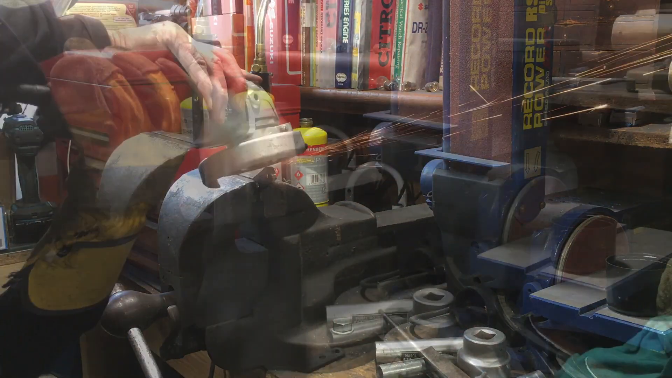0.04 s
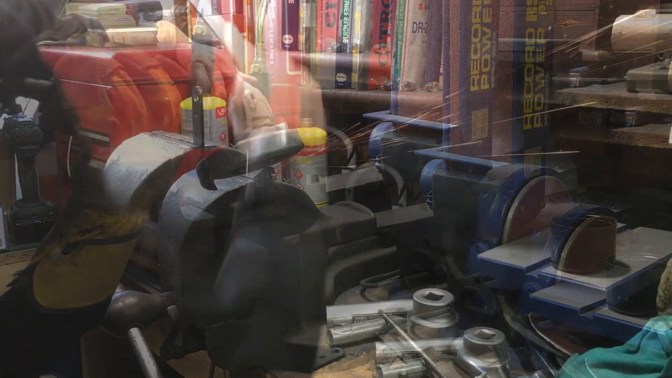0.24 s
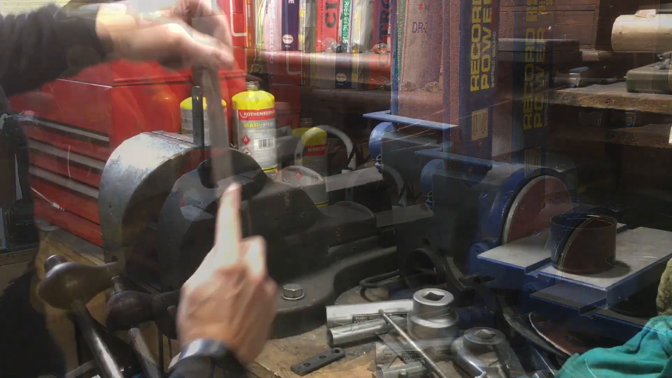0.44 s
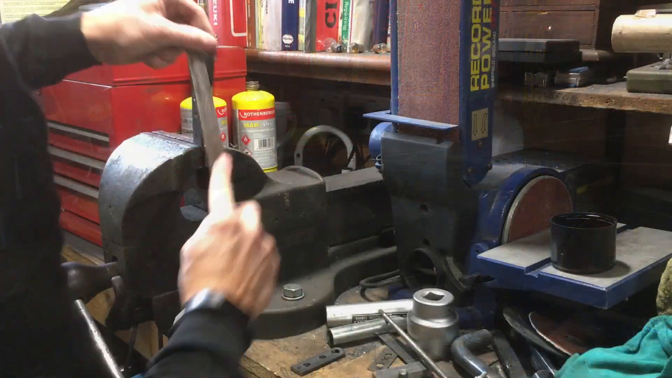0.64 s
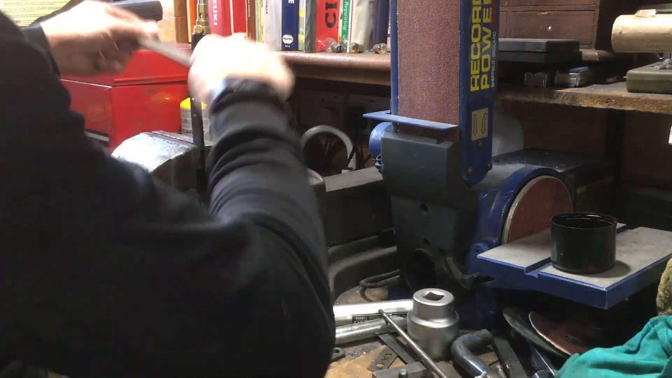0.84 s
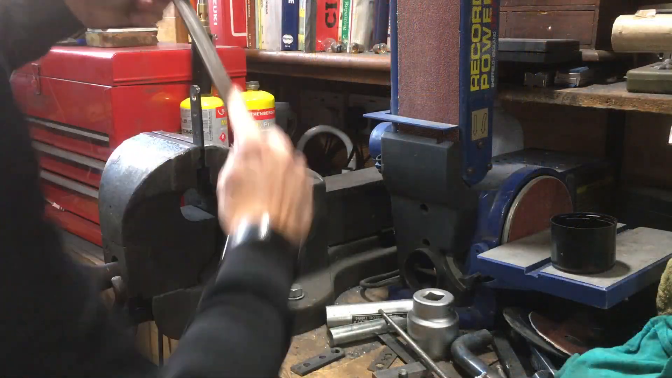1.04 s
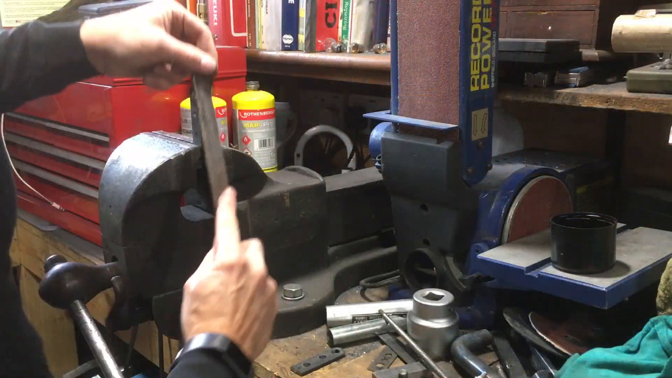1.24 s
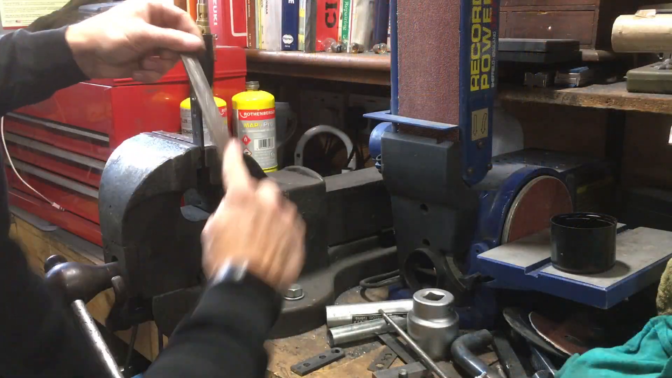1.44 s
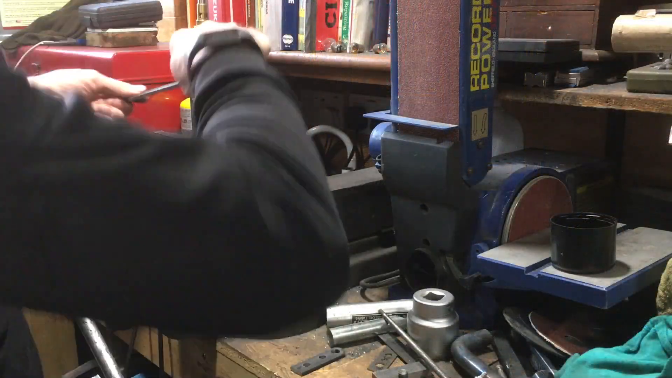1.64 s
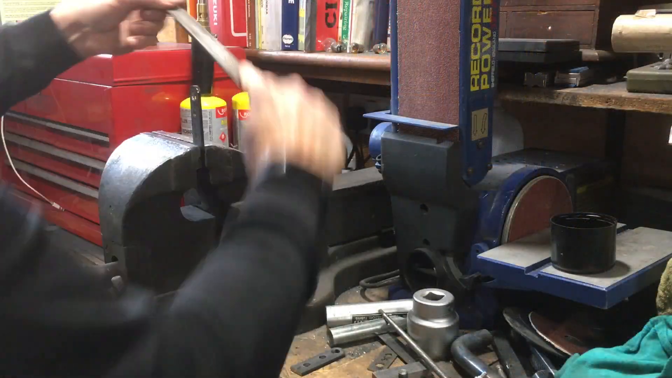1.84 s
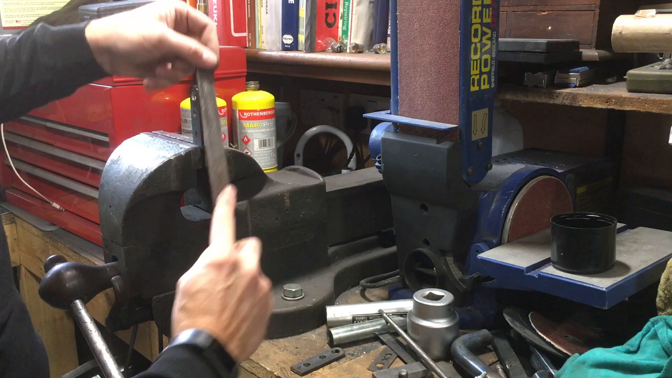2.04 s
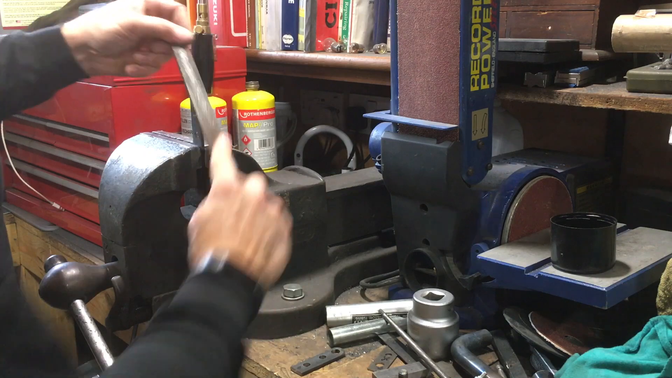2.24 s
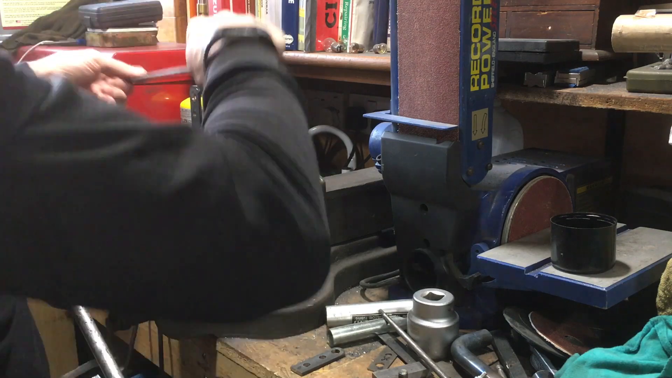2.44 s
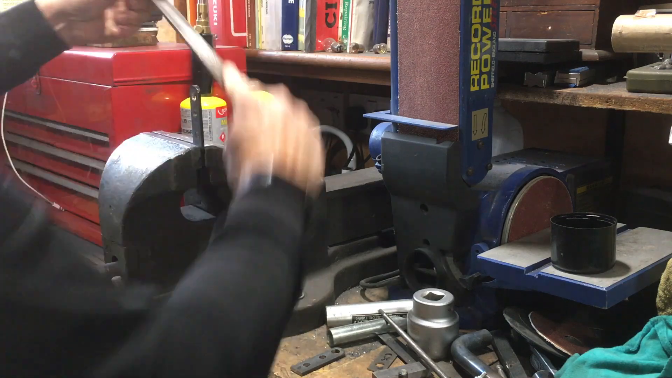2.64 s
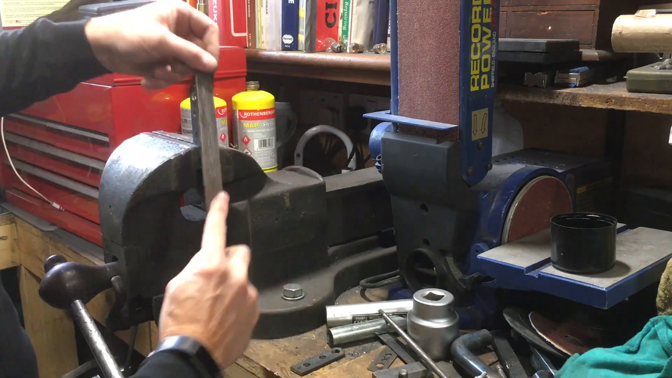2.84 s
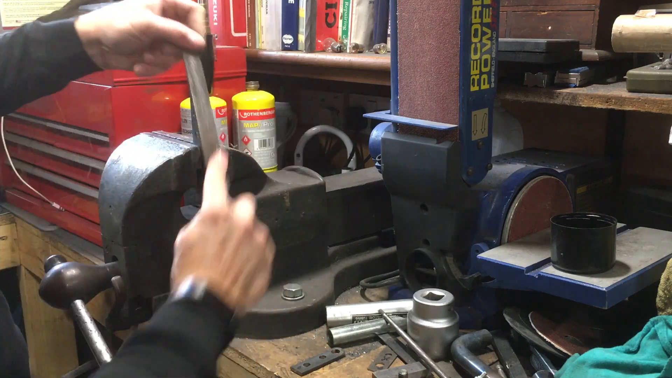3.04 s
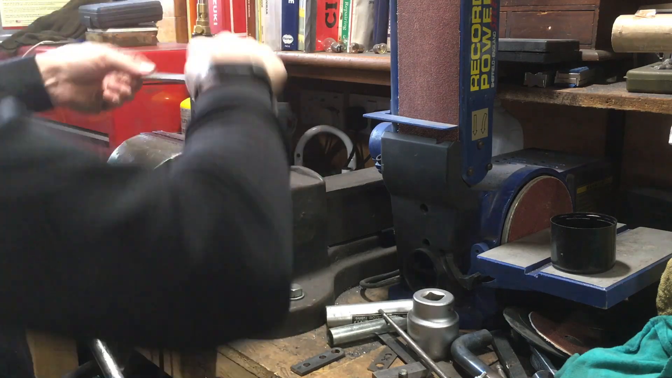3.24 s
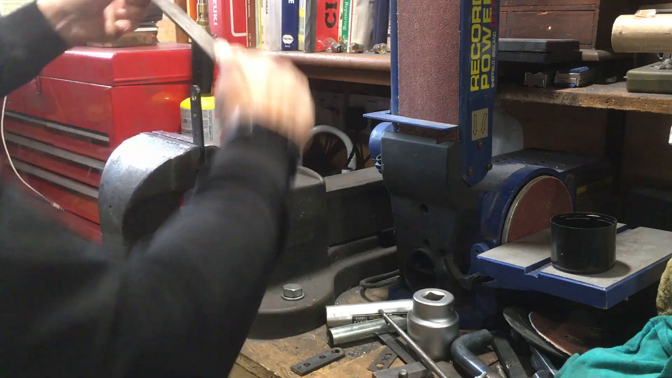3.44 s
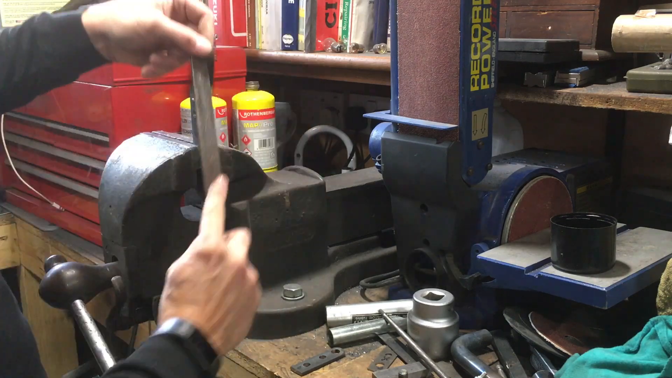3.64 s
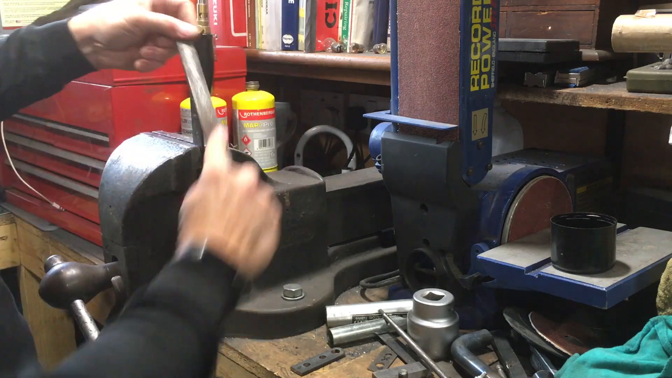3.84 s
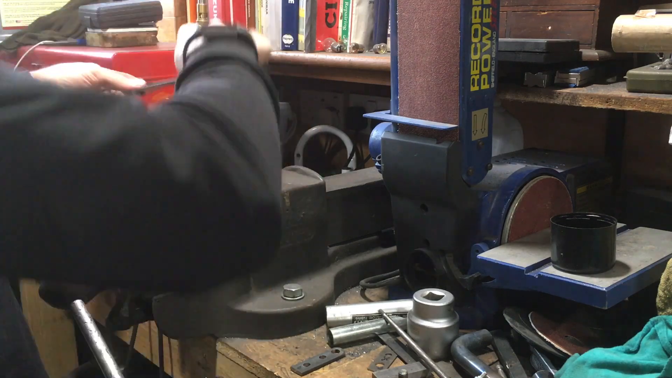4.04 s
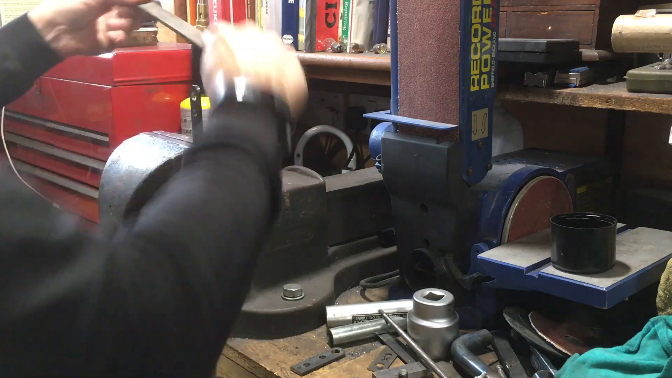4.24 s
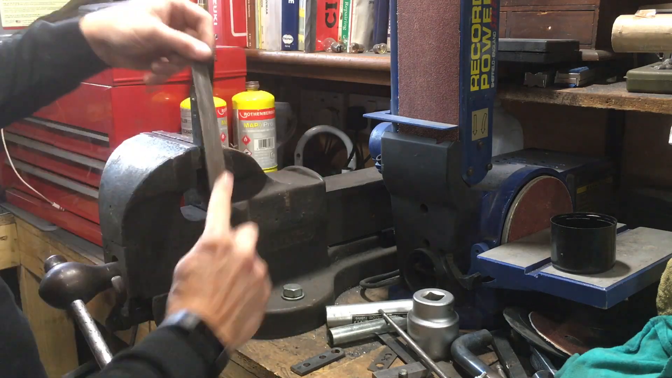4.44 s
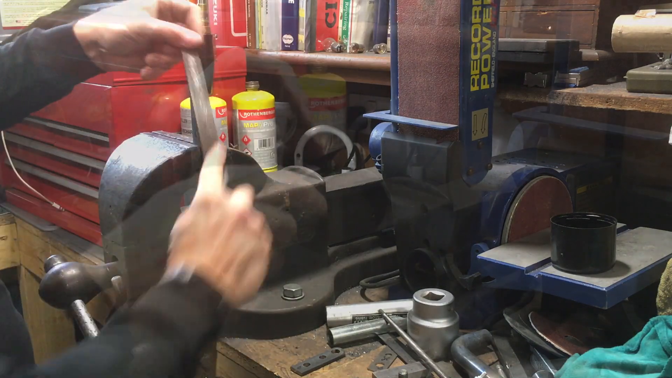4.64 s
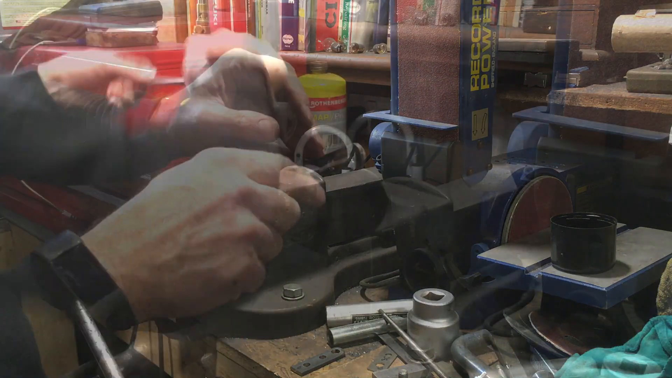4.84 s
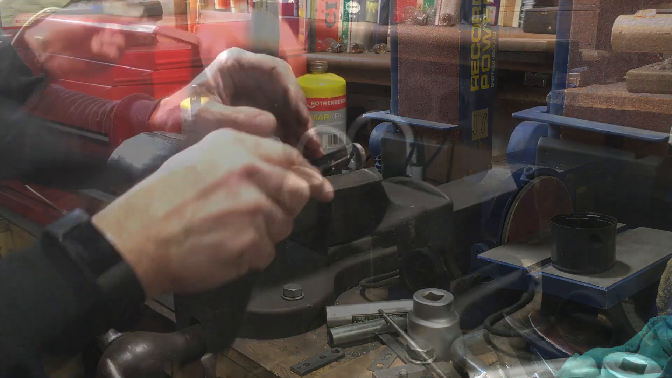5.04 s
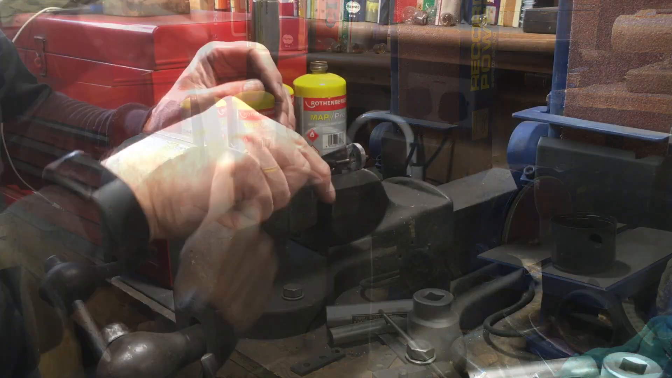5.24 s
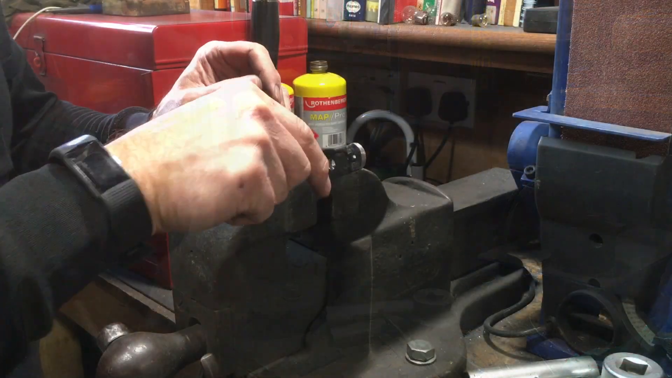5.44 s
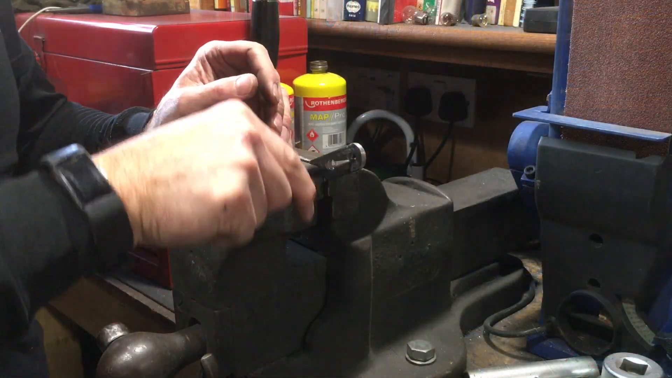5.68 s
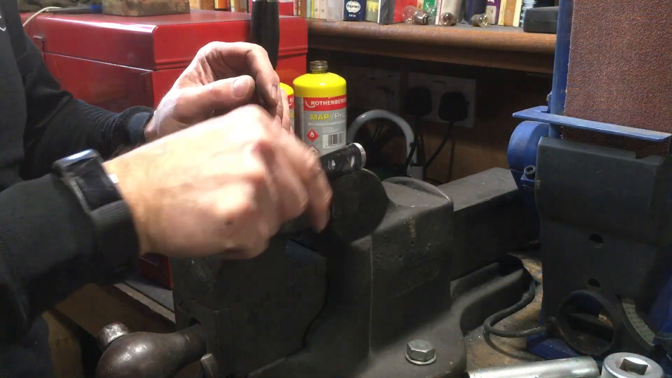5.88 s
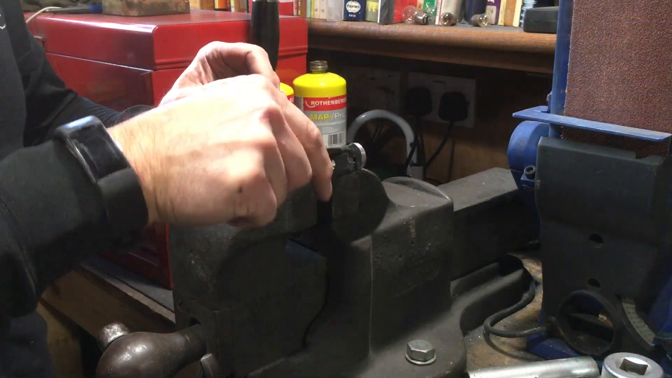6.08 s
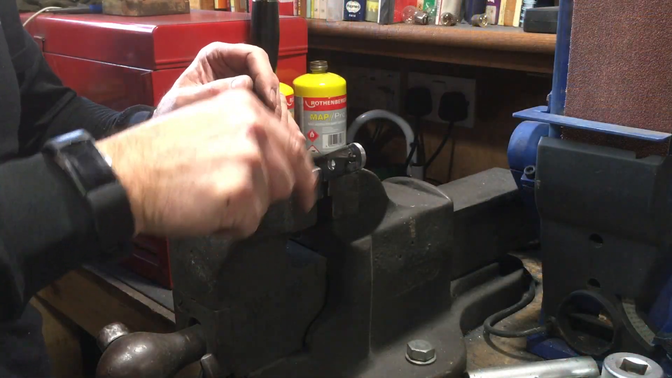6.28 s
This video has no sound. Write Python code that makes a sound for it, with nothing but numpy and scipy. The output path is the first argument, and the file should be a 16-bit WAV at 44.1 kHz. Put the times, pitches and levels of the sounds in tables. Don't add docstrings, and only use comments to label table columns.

```python
import sys
import numpy as np
from scipy import signal
from scipy.io import wavfile
from scipy.ndimage import uniform_filter1d

SR = 44100
rng = np.random.default_rng(int(sys.argv[2]) if len(sys.argv) > 2 else 0)


def transcribe(signal):
    frames = np.atleast_2d(signal).T
    limited = np.clip(frames, -1, 1)
    pcm = np.round(limited * 32767).astype(np.int16)
    wavfile.write(sys.argv[1], SR, pcm)


def level_to_linear(level):
    exponent = np.asarray(level, float) / 20
    return 10 ** exponent


N = 278271


def evened(x):
    return x / np.sqrt(np.mean(x ** 2) + 1e-20)


def smooth_twice(x, size, axis=-1):
    return uniform_filter1d(uniform_filter1d(x, size=size, axis=axis), size=size, axis=axis)


def read(points, hz):
    f, value = np.transpose(points)
    return np.interp(np.log(hz + 1), np.log(f + 1), value)


def add(mix, s, sound):
    part = mix[round(s * SR):][:len(sound)]
    part += sound[:len(part)]


def colour(x, spectrum, lo_hz=0, hi_hz=SR):
    hz = np.fft.rfftfreq(4096, 1 / SR)
    edges = 1 / (1 + (lo_hz / (hz + 1)) ** 8) / (1 + (hz / hi_hz) ** 8)
    log_gain = np.log(level_to_linear(read(spectrum, hz)) * edges + 1e-5)
    circle = signal.hilbert(np.r_[log_gain, log_gain[-2:0:-1]])
    impulse = np.fft.ifft(np.exp(np.conj(circle))).real
    return signal.oaconvolve(x, impulse)[:len(x)]


def ring(x, modes):
    out = 0
    for k, (hz, width, db) in enumerate(modes):
        pole = np.exp((2j * hz - width) * np.pi / SR)
        mode = signal.lfilter([1 - abs(pole)], [1, -pole], x).real
        out = out + (-1) ** k * level_to_linear(db) * 2 * mode
    return out


def glide(x, hz, width):
    turn = np.exp(2j * np.pi * np.cumsum(hz + np.zeros(len(x))) / SR)
    r = np.exp(-np.pi * width / SR)
    return 2 * (turn * signal.lfilter([1 - r], [1, -r], x / turn)).real


def grit(size, per_s, spread_db, clump_db):
    chance, strength, sign, slow = rng.random((size, 4)).T
    hits = (chance < per_s / SR) * level_to_linear(-spread_db * np.log(strength + 0.016)) * (sign - 0.5)
    clumps = evened(smooth_twice(slow - 0.5, 160))
    return evened(hits * level_to_linear(clump_db * clumps))


def burst(t60, rise_s):
    t = np.arange(6000) / SR
    return rng.standard_normal(len(t)) * (1 - np.exp(-t / rise_s)) * level_to_linear(-60 * t / t60)


def mottled(x, patch_db):
    z = signal.stft(x, nperseg=256)[2]
    patches = rng.standard_normal(z.T.shape).T
    patches = uniform_filter1d(patches, size=4, axis=0)
    patches = evened(uniform_filter1d(patches, size=14, axis=1))
    return signal.istft(z * level_to_linear(patch_db * patches), nperseg=256)[1][:len(x)]


# frequency [Hz], T60 [s].
ROOM_T60 = [(100, 0.19), (500, 0.21), (2000, 0.22), (6000, 0.16), (15000, 0.12)]


def room(x):
    hz, t, z = signal.stft(rng.standard_normal(SR // 2), SR, nperseg=256)
    tail = signal.istft(z * level_to_linear(-60 * t / read(ROOM_T60, hz)[:, None]), SR, nperseg=256)[1]
    tail[:150] = 0
    return signal.oaconvolve(x, tail / np.linalg.norm(tail))[:N]


# frequency [Hz], density [dB per Hz].
AIR_COLOUR = [(59, -22.5), (85, -12), (105, -10), (130, -30), (146, -34), (205, -24.5), (313, -29),
              (567, -29.5), (762, -40.5), (884, -31), (1970, -42), (2190, -38.5), (4800, -44.5),
              (9450, -41), (10500, -44), (12700, -37), (15700, -40.5)]


def room_air():
    air, t = rng.standard_normal(N), np.arange(N) / SR
    rumble_db = np.interp(t, [0, 0.6, 4.7, 5.3], [-22.0, 6.5, -0.5, 4.5])
    rumble = colour(air, AIR_COLOUR, 0, 460) * level_to_linear(rumble_db)
    return level_to_linear(-68.5) * (rumble + colour(air, AIR_COLOUR, 447)) / np.std(colour(air, AIR_COLOUR))


# time [s], main hum [dB], its overtone [dB], second motor [dB].
HUM_LEVELS = [
    (0, -67, -80, -72),
    (.35, -57.5, -81, -76),
    (1.3, -52.5, -76, -73.5),
    (2.5, -51.5, -61.5, -94),
    (3.6, -51, -68.5, -83),
    (4.6, -53.5, -74.5, -64),
    (5, -62, -86, -87),
    (5.3, -68, -80, -74),
    (5.7, -62, -69, -62.5),
    (6.31, -70, -86, -52),
]
# frequency [Hz], width [Hz], level [dB].
HUM_MODES = [(72.94, 1.18, 3.5), (219.9, 3, -17), (322.5, 6.7, -28.5)]


def fan_hum():
    fan, t = rng.standard_normal(N), np.arange(N) / SR
    s, *levels_db = np.transpose(HUM_LEVELS)
    main, upper, motor = (level_to_linear(np.interp(t, s, db)) for db in levels_db)
    steady = 0.91 * np.sin(2 * np.pi * HUM_MODES[0][0] * t)
    hum = (0.4 * evened(ring(fan, HUM_MODES)) + steady) * main
    hum = hum + upper * evened(ring(fan, [(109.7, 3, 0)]))
    return hum + motor * evened(ring(fan, [(92.8, 4, 0)]))


# start [s], length [s], level [dB], top end and low rub against it [dB].
DRAGS = [(5.079, 0.052, -64, -11, -22), (5.138, 0.058, -64, 3, 6.5), (5.2, .07, -75, -2, 8),
         (5.27, 0.098, -71, 2, 3), (5.323, 0.056, -64.5, 13, 5.5), (5.35, 0.057, -76, -13, 17),
         (5.458, 0.085, -52, -11, 1), (5.558, 0.11, -51.5, 1, -3), (5.62, 0.12, -44.5, -6, -3),
         (5.74, 0.096, -40, -12, -5), (5.882, 0.15, -47, 0, -3.5), (6.039, 0.081, -46.5, -5, 0.5),
         (6.125, 0.12, -59, -4, -20), (6.181, 0.15, -46.5, -3, -18)]


def drags(t):
    rise_share = 0.58
    out = np.zeros((3, len(t)))
    for s, length_s, db, top_db, rub_db in DRAGS:
        share = np.clip((t - s) / length_s, 0, 1)
        swell = level_to_linear(db) * np.sin(np.pi * share ** (np.log(0.5) / np.log(rise_share))) ** 1.3
        out = out + swell * level_to_linear(np.array([[rub_db], [0], [top_db]]))
    return out


# teeth bite [s], lift [s], rasp [dB], surge of the last push [dB],
# bracket song [dB].
STROKES = [
    (0.623, 0.842, -48, 15, -34.5),
    (1.389, 1.657, -47, 7, -31.5),
    (2.197, 2.448, -46, 8.5, -29.5),
    (2.99, 3.298, -46, 5, -30),
    (3.804, 4.071, -45, 7, -27),
    (4.6, 4.917, -49, 5.5, -34),
]
# time [s], half width [s], level [dB].
NUDGES = [
    (8, .012, -48),
    (5.5, 0.051, -54),
    (0.087, 0.044, -60),
    (5.875, 0.012, -55),
]


def shaking(t):
    rest_db, small_file_db, shake_db = -67.5, -10, -42.5
    level = level_to_linear(rest_db) + level_to_linear(small_file_db) * uniform_filter1d(drags(t)[1], size=5000)
    for bite_s, lift_s, _, _, song_db in STROKES:
        peak_s = lift_s - 0.057
        rise_db = 22 * (t - peak_s) / (peak_s - bite_s)
        shape_db = np.minimum(rise_db, -110 * (t - peak_s))
        level = level + level_to_linear(shake_db + 0.46 * (song_db + 31.0) + shape_db)
    for s, width_s, db in NUDGES:
        level = level + level_to_linear(db) * np.exp(-((t - s) / width_s) ** 2)
    return level


# frequency [Hz], density [dB per Hz].
BENCH_COLOUR = [(12, -37), (20, -3.5), (38, -2.5), (59, -1.5), (82, 1.5), (162, -13), (200, -14),
                (260, -52), (440, -120)]
# frequency [Hz], width [Hz], lift [dB].
BENCH_MODE = [(49, 14, 5.5)]


def bench():
    push = rng.standard_normal(N)
    rumble = colour(push + ring(push, BENCH_MODE), BENCH_COLOUR)
    return evened(rumble) * shaking(np.arange(N) / SR)


# start [s], length [s], level [dB], pitch [Hz].
RUSTLES = [
    (1.075, 0.11, -70.5, 9500),
    (1.794, 0.081, -68, 11100),
    (2.607, 0.058, -72, 6000),
    (3.591, 0.065, -71.5, 5540),
    (3.612, 0.059, -68, 1170),
    (5.024, 0.016, -60, 13000),
]


def rustle(s, length_s, db, hz):
    fibres = grit(round(length_s * SR), 7200, 1.2, 1.4)
    return s, level_to_linear(db) * evened(ring(fibres, [(hz, 0.47 * hz, 0)])) * np.hanning(len(fibres))


# time [s], peak [dB], pitch [Hz].
TICKS = [
    (1.0323, -58, 930),
    (1.126, -47, 1640),
    (1.9616, -51, 1500),
    (2.627, -59, 1040),
    (2.646, -65, 1040),
    (2.733, -54, 1580),
    (2.808, -63, 1120),
    (3.573, -52, 1600),
    (4.459, -50, 1550),
]


def tick(s, db, hz):
    knock = uniform_filter1d(burst(0.05, 0.0012), size=7) * 1.7
    return s, level_to_linear(db) * 1.72 * ring(knock, [(hz, 500, 0), (1.74 * hz, 600, -8), (0.88 * hz, 900, -12)])


# time [s], peak [dB], top end [dB],
# tang ring [dB].
CATCHES = [
    (5.089, -57, -83, -85),
    (5.146, -50, -57, -51),
    (5.167, -48, -68, -70),
    (5.2193, -60, -78, -82),
    (5.2827, -69, -78, -80),
    (5.298, -59.5, -60, -73),
    (5.3367, -52, -54, -72),
    (5.4448, -67, -85, -85),
           (5.464, -34.5, -45, -60), (5.4813, -35.5, -48, -60), (5.4884, -37.5, -35.5, -58),
         (5.5207, -43, -52, -55), (5.5619, -31.5, -42, -56), (5.5821, -34, -48, -57),
         (5.6326, -42, -54, -46), (5.6593, -36, -53, -46), (5.6736, -38, -46, -46), (5.6904, -48, -52, -49),
         (5.6955, -43, -55, -55), (5.7014, -42, -52, -56), (5.733, -39.5, -61, -57),
         (5.7505, -36.5, -56, -52), (5.7841, -32.5, -34, -52), (5.8024, -38.5, -34.5, -55),
         (5.815, -34, -42, -44), (5.826, -40, -51, -47), (5.8394, -36.5, -52, -51), (5.9308, -47, -49, -61),
         (5.9444, -39, -50, -56), (5.9614, -35.5, -54, -52), (5.978, -32.5, -47, -53),
         (5.9881, -31.5, -49, -49), (6.0452, -38.5, -55, -54), (6.0653, -36, -33.5, -51),
         (6.0876, -39, -50, -54), (6.0924, -54, -51, -53), (6.1089, -49, -45, -54),
         (6.1268, -36.5, -38.5, -35), (6.194, -38.5, -48, -55), (6.2079, -35.5, -52, -54),
         (6.2174, -39, -48, -49), (6.2439, -32.5, -37, -33), (6.259, -30.5, -36, -51),
         (6.2744, -30.5, -43, -51), (6.284, -39, -46, -47), (6.2934, -41, -56, -58)]
# frequency [Hz], density [dB per Hz].
SCRATCH_COLOUR = [(120, -33), (200, -8.5), (300, -7), (759, -5), (847, -9), (1360, -7), (2730, 0.5),
                  (3930, -8.5), (4550, -11), (5080, -12.5), (5880, -10), (10600, -11.5), (14700, 0),
                  (15900, -31)]
# frequency [Hz], width [Hz], lift [dB].
SMALL_MODES = [(860, 45, 10), (1140, 30, 9), (2232, 60, 7), (2650, 60, 8), (2855, 70, 8.5), (3090, 60, 3),
               (4380, 100, 8), (4650, 70, 9), (5950, 180, 10), (7000, 300, 3), (9500, 400, 5),
               (12700, 300, 1), (14530, 260, 11)]


def small_file():
    t = np.arange(5, N / SR, 1 / SR)
    dust, single_teeth = grit(len(t), 6000, 2.9, 3.2), grit(len(t), 350, 2.2, 1.5)
    drag = evened(dust + 0.5 * single_teeth)
    resting = level_to_linear(np.array([[-76], [-75.5], [-68.5]])) * np.clip((t - 5.42) / 0.058, 0, 1)
    low, mid, high = drag * (level_to_linear(-8.5) * drags(t) + resting)
    tang = level_to_linear(-9) * high
    for s, db, top_db, tang_db in CATCHES:
        snap, click = burst(0.047, 0.00078), burst(0.007, 0.00005)
        add(low, s - t[0], level_to_linear(db - 13.5) * snap)
        add(mid, s - t[0], level_to_linear(db - 6.5) * (snap + 1.46 * click))
        add(high, s - t[0], level_to_linear(top_db - 1.0) * (0.97 * snap + 3.1 * click))
        add(tang, s - t[0], level_to_linear(tang_db + 1.0) * (snap + 1.1 * click))

    def body(x, *edges):
        return colour(0.6 * x + ring(x, SMALL_MODES[:-1]), SCRATCH_COLOUR, *edges)

    tang_mode = SMALL_MODES[-1:]
    out = body(low, 0, 1630) / np.std(body(drag, 540, 1680))
    out = out + body(mid, 1220, 7350) / np.std(body(drag, 1440, 9000))
    out = out + level_to_linear(-5.5) * body(high, 6240) / np.std(body(drag, 6100))
    out = out + 0.7 * ring(tang, tang_mode) / np.std(ring(drag, tang_mode))
    return t[0], mottled(out, 2.4)


# time [s], level [dB].
GRIND_LEVELS = [
    (0.0, -38.5),
    (0.09, -39.5),
    (0.422, -49),
    (0.494, -53.5),
    (0.578, -58.5),
    (0.588, -63),
    (0.592, -50),
]
# frequency [Hz], density [dB per Hz].
GRIND_COLOUR = [(88, -103), (150, -73), (217, -21.5), (492, -26), (574, -11), (815, -12.5), (1410, -3),
                (1920, -8), (2420, 2.5), (4980, -8.5), (6170, -7), (7790, -10), (9100, -6.5), (10400, -8),
                (15700, -7.5)]
# frequency [Hz], width [Hz], level [dB].
DISC_MODES = [(2200, 52, 9), (2470, 130, 2), (2600, 55, -15), (3100, 89, -6), (4520, 79, 12), (6640, 90, 1),
              (8970, 110, -7), (11900, 590, 19), (15250, 200, 8)]
# frequency [Hz], level [dB].
GEAR_TONES = [(6708, -58), (13431, -58), (3177, -58), (15655, -64), (560, -63), (2406, -55), (9076, -56),
              (6390, -60), (2062, -60)]
# time [s], peak [dB], 6 kHz ring against the 9 kHz ring [dB].
BOUNCES = [(0.018, -35, -20), (0.046, -33, -10), (0.0697, -31, -9), (0.097, -25, -18), (0.123, -25.5, -11),
           (0.157, -26.5, -4.5), (0.2054, -32, 0.5), (0.228, -28.5, -4), (0.249, -35, -2),
           (0.2768, -29, -8), (0.301, -36, -1), (0.322, -30, -10), (0.3437, -33, -5), (0.377, -31.5, -6),
           (0.4045, -37.5, -3), (0.4135, -36, -10), (0.432, -35, -13), (0.4603, -39, -4),
           (0.5136, -41, -13), (0.5482, -40, -10), (0.566, -43, -18), (0.576, -46, -13)]


def grinder():
    s, db = np.transpose(GRIND_LEVELS)
    t = np.arange(s[0], s[-1], 1 / SR)
    level_db = np.interp(t, s, db)
    sparks = grit(len(t), 12000, 2.4, 1.8)
    hiss = evened(colour(sparks, GRIND_COLOUR)) + 0.45 * evened(ring(sparks, DISC_MODES))
    out = evened(mottled(hiss, 0.43)) * level_to_linear(level_db + 5.0)
    for hz, db in GEAR_TONES:
        waver = np.cumsum(rng.standard_normal(len(t))) * 0.077
        out += level_to_linear(db + 11.0 + level_db - level_db[0]) * np.sin(2 * np.pi * hz * t + waver)
    for s, db, mid_db in BOUNCES:
        puff = burst(0.033, 0.001)
        ease_db = -29 * s
        disc = [(9130, 260, 12.6), (6320, 410, 18 + mid_db), (11800, 350, 6.4)]
        rim, clamp = (15200, 380, 8 + ease_db), (2330, 700, 10 + ease_db)
        add(out, s, level_to_linear(db) * (ring(puff, disc + [rim, clamp]) + 0.081 * puff))
    return out


# time [s], level [dB], time until a hand damps it [s].
LIFTS = [
    (.85, -45, 0.32),
    (1.68, -43.5, 0.31),
    (2.47, -58.5, 0.39),
    (3.32, -54.5, 0.4),
    (4.1, -52, 0.35),
    (4.96, -65, 0.16),
]


def lift(s, db, hold_s):
    file_hz, t60 = 566.7, 0.57
    t = np.arange(0, hold_s, 1 / SR)
    tone = np.sin(2 * np.pi * file_hz * t) * signal.windows.tukey(len(t), 0.1)
    return s, level_to_linear(db - 60 * t / t60) * tone


# time [s], peak [dB], low thud and top end against it [dB].
LANDINGS = [
    (0.595, -35.5, -5.5, 2.5),
    (1.333, -32, -14, -3),
    (2.151, -36, -14.5, 5),
    (2.9784, -49, -7, -39),
    (3.7689, -39.5, -6.5, -1),
    (4.576, -40.5, -16, -8.5),
]
# frequency [Hz], density [dB per Hz].
CLACK_COLOUR = [(120, -30), (200, -6), (300, -6), (495, 3.5), (1320, 0.5), (1660, 4.5), (2390, -4),
                (3160, -3), (3840, -8), (4650, -5), (10200, -16.5), (13100, -12), (15300, -11),
                (16400, -26)]
# frequency [Hz], width [Hz], level [dB].
BRACKET_MODES = [(1925, 40, -7), (2070, 27, 1), (2168, 26, 0.5)]


def landing(s, db, thud_db, top_db):
    crack = burst(0.067, 0.00053) + 1.3 * burst(0.0091, 0.0001)
    unit = np.std(crack) / np.std(colour(crack, CLACK_COLOUR, 740, 7800))
    parts = colour(crack, CLACK_COLOUR, 723, 5700)
    parts = parts + level_to_linear(top_db + 1.0) * colour(crack, CLACK_COLOUR, 4100)
    parts = parts + level_to_linear(thud_db + 16.0) * colour(crack, CLACK_COLOUR, 0, 795)
    return s, level_to_linear(db) * (unit * parts + 2.0 * ring(crack, BRACKET_MODES))


BRACKET_HZ = 2096


def song(jolts, drive, upper_db):
    locked = ring(jolts, [(BRACKET_HZ, 200, 0)])
    locked = locked / np.sqrt(uniform_filter1d(locked ** 2, size=500) + 1e-12) * drive
    low, middle, (hz, width, db) = BRACKET_MODES
    return 0.45 * locked + level_to_linear(4.0) * ring(locked, [low, middle, (hz, width, db + upper_db)])


# frequency [Hz], density [dB per Hz].
RASP_COLOUR = [(1410, -34), (2400, -14), (2700, -4), (2940, 3.5), (3420, -3), (4160, -6.5), (5140, -8.5),
               (5880, -4), (7860, -13.5), (9130, -5), (12300, -17.5), (13400, -5.5), (15700, -8)]
# frequency [Hz], width [Hz], level [dB].
FILE_MODES = [(2868, 54, 8), (3060, 88, -34.5), (3325, 93, -7), (4100, 68, -15), (4320, 160, -9.5),
              (5700, 47, -9.5), (7010, 78, -5.5), (9500, 54, 2.5), (11370, 210, 0.5), (12280, 170, 1),
              (13000, 220, 5.5), (15300, 180, -0.5)]


def rasp(teeth, tooth_hz, progress):
    double = glide(teeth, 2 * tooth_hz, 424)
    overtone = evened(ring(double, FILE_MODES) + 0.5 * glide(teeth, 2 * tooth_hz, 500))
    stretched = np.cumsum(1 - 0.039 * (progress - 0.5))
    sinking = np.interp(stretched, np.arange(len(teeth)), ring(teeth, FILE_MODES[7:]))
    modes = evened(ring(teeth, FILE_MODES[:7]) + sinking)
    hiss = evened(colour(teeth, RASP_COLOUR)) + 0.69 * modes + 0.28 * overtone
    return evened(mottled(hiss, 2.8))


# favour of the upper bracket mode [dB], share of the stroke spent biting in,
# load on the vice [dB], lateness of the speed-up [exponent], full speed before the lift [s].
GRIPS = [
    (6, 0.11, 0.5, 4.9, 0.0137),
    (-2.5, 0.35, 0, 2.6, 0.028),
    (1.5, 0.15, 0, 3, 0.0045),
    (0.5, 0.42, -1, 2.5, 0.0125),
    (-8.5, 0.18, 0, 1.94, 0.0144),
    (-5, 0.25, 0.5, 1.83, 0.0217),
]
# time [s], half width [s], level [dB].
STUMBLES = [
    (0.743, 0.017, -8),
    (2.37, 0.022, -4),
    (4.031, 0.018, -1.5),
]
# frequency [Hz], width [Hz], level [dB].
VICE_MODES = [(235, 15, -1), (275.7, 15.6, -7.5), (336.4, 39, -2), (424, 24.7, -4), (541, 30.5, -1),
              (736, 78, -12.5)]
# frequency [Hz], width [Hz], level [dB].
BUZZ_MODES = [(1055, 45, 8), (1296, 60, -2), (1632, 45, 4), (1145, 2300, -2.5)]


def stroke(bite_s, lift_s, rasp_db, surge_db, song_db, upper_db, bite_share, load_db, late, lead_s):
    t = np.arange(bite_s, lift_s + 12000 / SR, 1 / SR)
    progress = np.minimum((t - bite_s) / (lift_s - lead_s - bite_s), 1)
    speed = progress ** late
    tooth_hz = 605 + (2040 - 605) * speed
    slack = np.maximum(1 - progress / bite_share, 0)
    after_lift_s = np.maximum(t - lift_s, 0)

    wobble = evened(smooth_twice(rng.standard_normal(SR), 900))[:len(t)]
    touch_db = -600 * after_lift_s - 10 * slack - 1.5 * wobble
    for s, width_s, db in STUMBLES:
        touch_db = touch_db + db * np.exp(-((t - s) / width_s) ** 2)
    touch = level_to_linear(touch_db) * np.minimum((t - bite_s) / 0.015, 1)
    press, surge = touch * level_to_linear(rasp_db), surge_db * speed ** 0.79

    teeth, jolts = grit(len(t), 9000, 2.2, 0.94), grit(len(t), 6000, 3.5, 1.88)
    jolts = jolts + 0.11 * glide(jolts, tooth_hz, 181)
    growl_hz = 540 + (341 - 540) * progress
    jolts = jolts + 0.83 * glide(jolts, growl_hz, 98)

    hiss = rasp(teeth, tooth_hz, progress)
    body = signal.sosfiltfilt(signal.butter(2, 5200, fs=SR, output="sos"), hiss)
    treble_db = 0.32 * surge - 8.5 * slack
    out = press * (body * level_to_linear(surge) + (hiss - body) * level_to_linear(treble_db))

    lock = 1 / (1 + ((tooth_hz - BRACKET_HZ) / 226) ** 2) ** 0.75 + level_to_linear(-42.5)
    drive = touch * level_to_linear(song_db - 300 * after_lift_s) * lock
    out = out + mottled(song(jolts, drive, upper_db), 0.5)

    vice_db = 4.5 + load_db + 0.5 * slack - 3 * speed
    buzz_db = -2 + 2 * speed + 0.87 * surge
    for modes, db in (VICE_MODES, vice_db), (BUZZ_MODES, buzz_db):
        out = out + ring(jolts * press * level_to_linear(db), modes) / np.std(ring(jolts, modes))
    return bite_s, out


def scene():
    tools, free_file = np.zeros(N), np.zeros(N)
    add(tools, 0, grinder())
    for row, grip in zip(STROKES, GRIPS):
        add(tools, *stroke(*row, *grip))
    for source, table in (landing, LANDINGS), (tick, TICKS), (rustle, RUSTLES):
        for row in table:
            add(tools, *source(*row))
    for row in LIFTS:
        add(free_file, *lift(*row))
    add(tools, *small_file())
    background = room_air() + fan_hum() + bench()
    return (level_to_linear(-1.0) * tools + level_to_linear(-9.0) * room(tools) + free_file + background)[None]


def roll_off(x):
    return signal.sosfilt(signal.butter(12, 16990, fs=SR, output="sos"), x)


def record(dry):
    def limit(hz):
        taps = signal.firwin(1023, hz, window=("kaiser", 10), fs=SR)
        return signal.oaconvolve(dry, taps[None], "same")

    narrow, wide = limit(15800), limit(16580)
    power = uniform_filter1d(np.diff(dry[0], prepend=0) ** 2, size=256) + 1e-14
    attack = power > 14 * np.roll(power, shift=400)
    open_share = np.minimum(2 * uniform_filter1d(attack * 1.0, size=600), 1)
    return roll_off(narrow + open_share * (wide - narrow))


dry = scene()
out = record(dry)
transcribe(out)
```